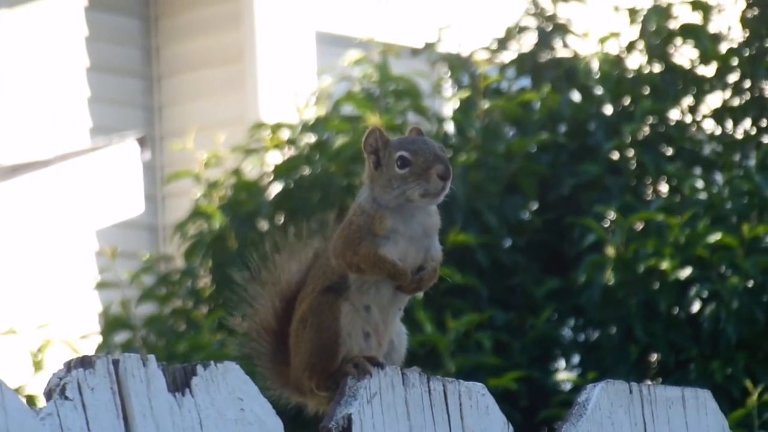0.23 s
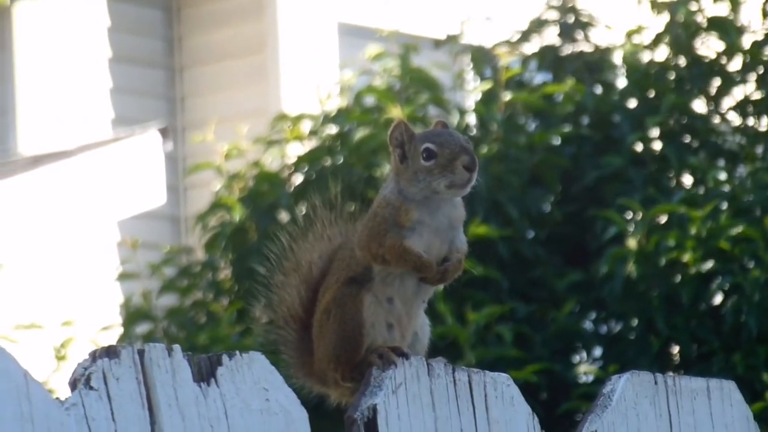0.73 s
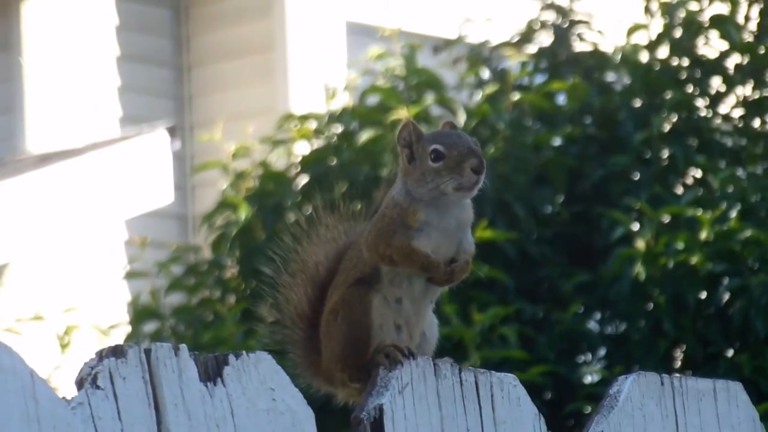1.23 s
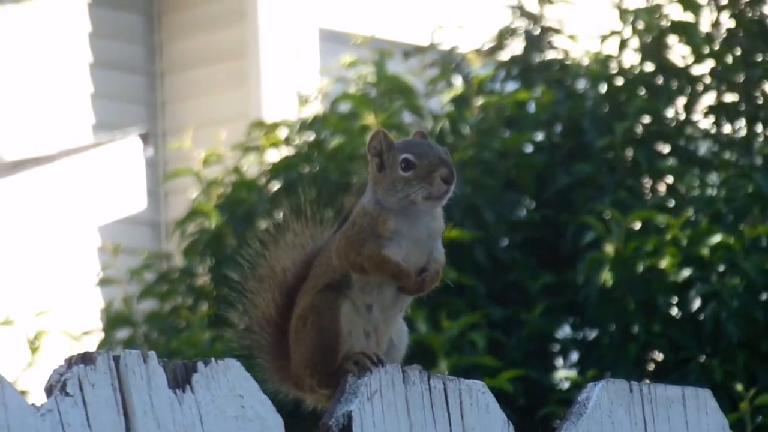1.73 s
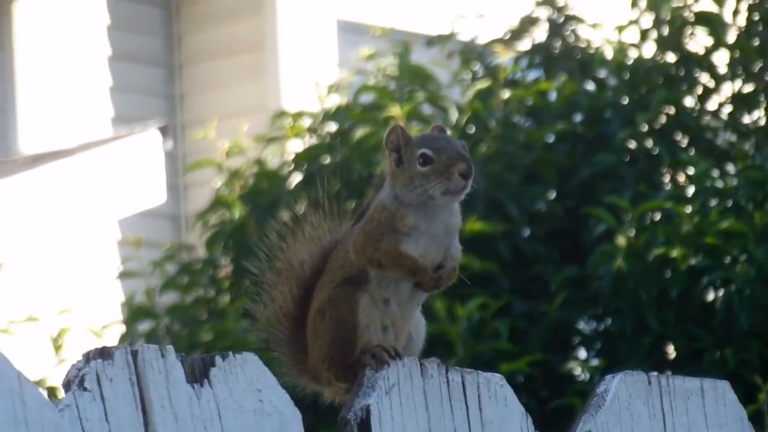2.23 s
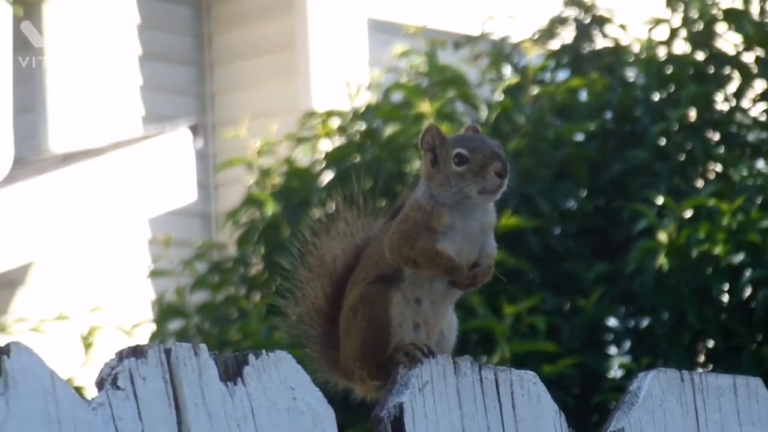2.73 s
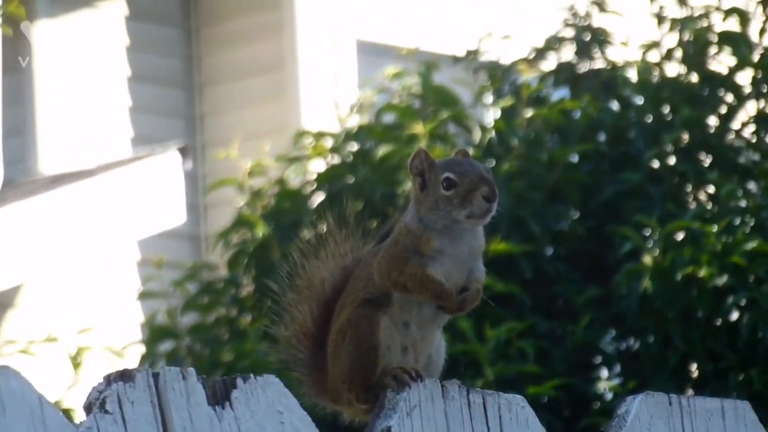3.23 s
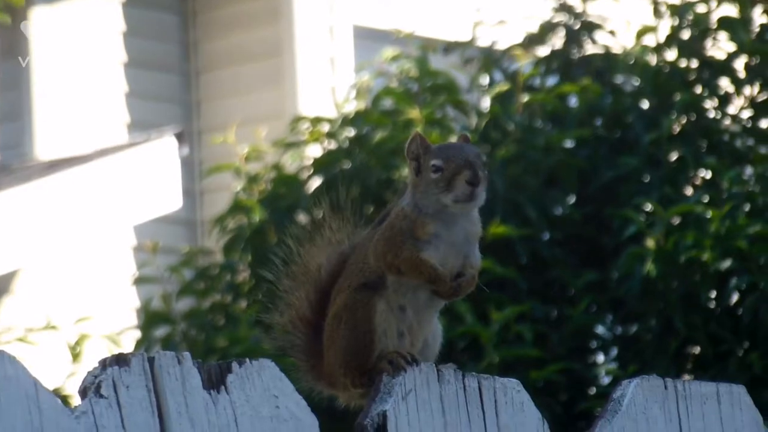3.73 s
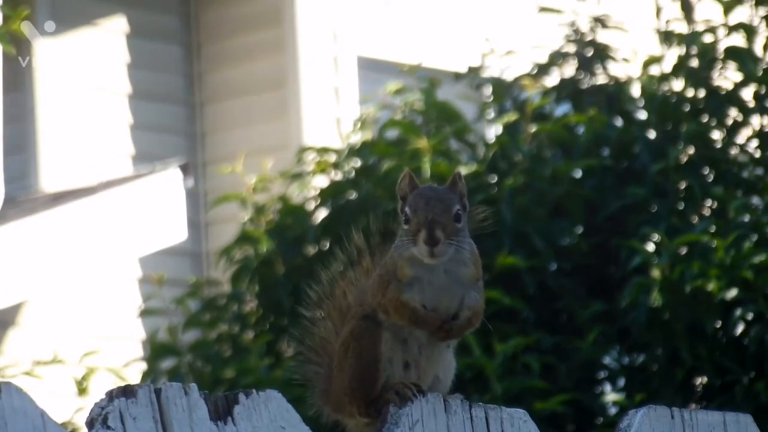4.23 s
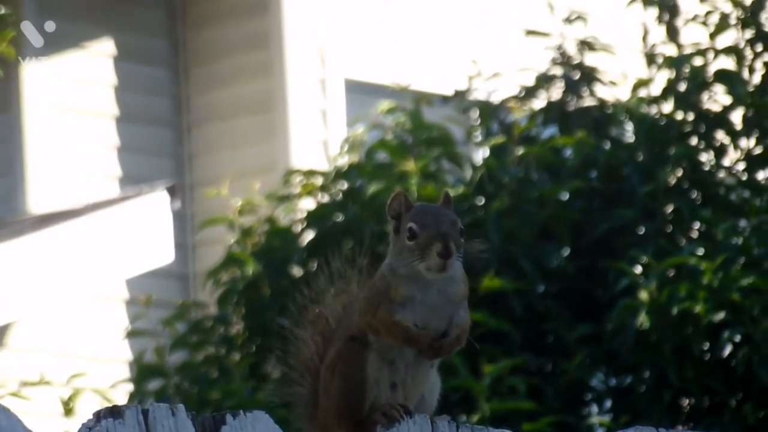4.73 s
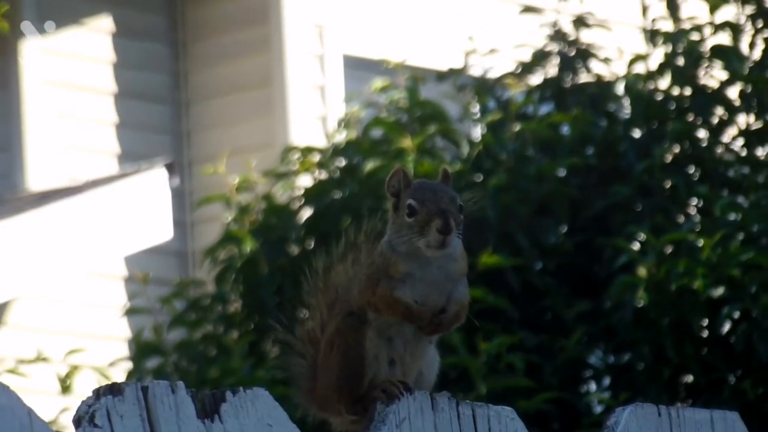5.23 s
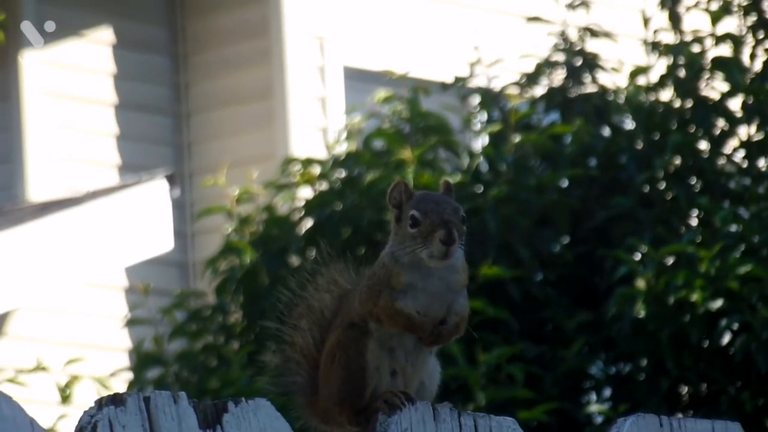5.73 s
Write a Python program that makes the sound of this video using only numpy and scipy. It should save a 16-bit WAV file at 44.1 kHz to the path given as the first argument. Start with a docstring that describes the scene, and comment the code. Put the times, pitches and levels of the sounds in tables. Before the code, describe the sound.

A squirrel gives quick, high, sharp chirps outdoors while a breeze starts rumbling and thumping on the microphone.

```python
"""Quiet suburban hush, and at once a squirrel chirping on a garden fence, metres from a stereo microphone.
Chirps are scooped whistles that turn raspy; the odd hoarse bark is pulses through throat and mouth.
Fence and house walls echo each call. From 0.9 s a breeze buffets the two microphone ports:
its eddies rumble, flutter and thump."""
import sys
import numpy as np
from scipy import signal
from scipy.fft import rfft, irfft
from scipy.io import wavfile
from scipy.ndimage import uniform_filter1d

SR = 44100
rng = np.random.default_rng(int(sys.argv[2]) if len(sys.argv) > 2 else 0)


def output_pcm(signal):
    """Save a mono or channel-first signal as 16-bit PCM at the path in sys.argv[1].

    Samples are clipped to [-1, 1] before scaling.
    """
    pcm = np.clip(np.atleast_2d(signal).T, -1, 1) * 32767
    wavfile.write(sys.argv[1], SR, np.round(pcm).astype(np.int16))


N = 263266

# hush spectrum: (frequency [Hz], relative density [dB])
HUSH_SPECTRUM = [(18, -35), (30, -8.5), (174, -6.5), (300, -2.5), (465, -4), (704, -1), (2000, -12.5),
                 (3780, -19), (5700, -24), (6700, -22), (9000, -28), (11500, -24), (13700, -30.5),
                 (14500, -21)]
# hush stereo width: (frequency [Hz], side over mid [ratio])
HUSH_WIDTH = [(60, 0.37), (600, 0.22), (1400, 0.426), (4000, 0.76), (14000, 0.04)]
# whistles: (time [s], length [s], scoop [s], plateau [Hz], register jump after [s], pitch after jump [Hz],
# level [dB], opening gain [dB], rasp [0-1], half-pitch partial [dB], octave [dB])
WHISTLES = [(0.106, 0.054, 0.00368, 5840, .016, 6700, -30.5, -3, 0.68, -30, -9.5),
            (0.346, 0.047, 0.0069, 5959, 0.023, 5900, -45.5, -1.5, 0.4, -21, -1),
            (0.571, 0.054, 0.003, 5650, 0.023, 6670, -41, -4, 0.6, -18, -2),
            (0.696, 0.05, 0.0055, 5970, .024, 6340, -34.5, -6.5, 0.25, -15.5, -4.5),
            (0.853, 0.054, 0.0072, 5970, 0.019, 6060, -44.5, -2.5, 0.5, -17.5, -2),
            (1.035, 0.097, 0.01, 5590, 0.037, 5835, -41, -6, 0.24, -21.5, -4),
            (1.273, 0.026, 0.0022, 6088, .013, 6040, -33, -9.5, .25, -28, -3),
            (1.398, 0.041, 0.004, 5950, 0.016, 5957, -37.5, -6, 0.16, -14, -7.5),
            (1.501, 0.035, 0.0035, 6050, .013, 5966, -37, -4.5, 0.22, -16.5, -9),
            (1.647, 0.04, 0.0029, 5844, 0.023, 5730, -41, -6, 0.38, -9, 1),
            (1.934, 0.036, 0.0049, 6010, 0.0133, 5705, -40, 1, 0.3, -26, -2),
            (2.104, 0.036, 0.003, 5840, .01, 6510, -37.5, -3, 0.4, -22, -5),
            (2.245, 0.02094, 0.0034, 5640, 0.0088, 5690, -39, 1.5, 0.08, -25, 1),
            (2.392, .04, 0.0031, 6060, 0.014, 6710, -32.5, -11.5, 0.02, -21, -10.5),
            (2.59, 0.0301, 0.00132, 5660, 0.0122, 6710, -36, -2, 0.46, -25, -10),
            (2.729, 0.0472, .0041, 6420, 0.0082, 6660, -34.5, -10, 0.68, -29.5, -14),
            (3.218, 0.041, 0.004, 6240, 0.018, 6200, -38, -4, 0.08, -18, -3),
            (3.416, 0.052, 0.0029, 5970, 0.0175, 6676, -35, -9, 0.2, -20, -4),
            (3.612, 0.029, .0036, 5950, .011, 5950, -41, -8, 0.33, -18, -0.5),
            (3.778, .039, 0.00286, 5930, 0.014, 6580, -33, -2, 0.3, -20.5, -3.5),
            (4.158, 0.0395, 0.0026, 5840, 0.016, 6530, -35, -8.5, 0.25, -19.5, -3),
            (4.326, 0.028, 0.0028, 5780, 0.014, 6510, -29, -9.5, 0.3, -21.5, -5.5),
            (4.578, 0.018, 0.00197, 5940, 0.0051, 5830, -34, -11, 0, -52, -8),
            (4.739, 0.027, 0.0029, 5770, 0.017, 5850, -37, 1, 0.1, -18.5, -1.5),
            (5.073, 0.036, 0.003, 5900, 0.018, 6120, -41.5, -3.5, 0.22, -18, 0),
            (5.281, 0.028, 0.00316, 6320, 0.00596, 6550, -37, -16, 0.68, -23, -3.5),
            (5.528, 0.059, 0.0017, 6350, 0.00994, 6610, -36.5, -17.5, 0.8, -24, -10.5),
            (5.765, 0.054, .0035, 5710, 0.02, 6630, -40, -4.5, 1, -22, -6),
            (5.961, 0.0306, 0.0027, 5800, 0.016, 5750, -38, -1, .25, -21, -4)]
# air noise in the mouth: (centre [Hz], width [Hz])
BREATH_BANDS = [(8300, 7200), (10200, 1400), (12600, 3400)]
# fence and wall echoes: (delay [s], left [dB], right [dB])
WALL_ECHOES = [(.010, -3.5, 4), (0.018, -3, -23), (0.032, -11.5, -8), (.08, -31, -29.5)]
# diffuse tail: (low edge [Hz], high edge [Hz], t60 [s], level before band-pass [dB])
YARD_TAILS = [(1000, 3700, 0.33, -2), (4900, 9300, 0.29, -3.5), (10400, 10700, 0.14, -19.5)]
# phase between the ports: (frequency [Hz], left lead [rad])
PORT_LEAD = [(1000, 0), (3000, -.4), (5000, -1.3), (6050, -1.5), (6500, -1.2), (9000, -1.2), (14000, -.9)]
# barks: (time [s], level [dB], treble [dB], length [s], puff [0-1])
HOARSE_BARKS = [(0.748, -47.5, -10.5, 0.027, 1), (1.1027, -33.5, -1, 0.03816, 0.5),
                (2.784, -39.5, 2, 0.018, 0.03), (2.911, -54, -9, 0.025, 0.69),
                (3.046, -46, -9.5, 0.018, 0.59), (3.8354, -38.5, 5, 0.017, 0), (3.9737, -40, 1, 0.02, 0.61),
                (4.371, -39.5, 4.5, .02, 0.58)]
# bark resonances, both tables: (centre [Hz], width per filter pass [Hz], gain [dB])
THROAT_MODES = [(1339, 230, 2.5), (2810, 1050, 7.5), (3520, 287, 12.5), (5910, 1700, 5), (7550, 280, 8.5)]
MOUTH_MODES = [(8400, 560, -1.5), (11160, 2700, 3.5), (12890, 1630, -4)]
# breeze on the ports: (time [s], rumble [dB], left minus right [dB])
BREEZE = [(0.9, -72, 5), (0.96, -50, 10), (1.2, -46.5, 5), (1.31, -64, -4), (1.376, -39.5, 13),
          (1.44, -56.5, 1), (1.552, -36, 8.5), (1.7, -46.5, 3), (1.86, -48, 2), (2.0, -41, 6),
          (2.18, -48, 11), (2.27, -56.5, 3), (2.44, -50, -2), (2.53, -59, 0), (2.58, -40.5, 14),
          (2.7, -49, 2), (2.93, -48, 5.5), (3.05, -54, 2), (3.27, -44.5, 8), (3.53, -47, 3),
          (3.6, -55.5, 7), (3.766, -54.5, 0), (3.81, -39.5, -8), (3.87, -44, 12), (4.01, -44.5, -12),
          (4.05, -43.5, 2), (4.18, -39.5, -11), (4.21, -45.5, 12.5), (4.35, -37.5, 3.5), (4.5, -53.5, 8),
          (4.64, -48.5, -16), (4.705, -38, 6), (4.76, -53, 9), (4.919, -44.5, -3), (5.03, -51, 6),
          (5.2, -38, -2), (5.374, -50.5, 2.5), (5.55, -41, 2), (5.83, -39, -2), (5.97, -50.5, 18)]
# strong eddies: (time [s], peak [dB], pitch [Hz], snap [dB], port [-1 left, 1 right])
STRONG_EDDIES = [(1.22, -21, 342, -40, -1), (1.38, -22, 382, -17, 1), (1.379, -15, 241, -30, -1),
                 (1.528, -19, 256, -35, -1), (1.545, -16, 376, -26, 1), (1.547, -16.5, 258, -36, -1),
                 (1.561, -14.5, 234, -35, -1), (1.574, -13.5, 243, -25.5, 1), (1.739, -23.5, 254, -20, -1),
                 (1.785, -21, 240, -28, -1), (1.911, -19.5, 220, -34, -1), (1.996, -14.5, 255.6, -23, 1),
                 (2.011, -8, 245, -9, -1), (2.099, -12.5, 397, -15, -1), (2.178, -22, 237, -43.5, -1),
                 (2.196, -21, 232, -34, -1), (2.59, -18.5, 255.5, -40, -1), (2.665, -25, 261, -36.5, -1),
                 (2.802, -25.5, 356, -17, -1), (2.932, -24.5, 167, -17, -1), (3.098, -25, 216, -27, -1),
                 (3.189, -19, 266, -39, -1), (3.243, -17.5, 292, -32, -1), (3.259, -20, 270, -17, -1),
                 (3.35, -18.5, 347, -3.5, -1), (3.426, -23.5, 232, -22, -1), (3.524, -12.5, 402, -17, -1),
                 (3.537, -11, 372, -8.5, -1), (3.666, -25, 320, -31, 1), (3.811, -15.5, 267, -37, 1),
                 (3.824, -9.5, 437, -40.5, -1), (3.919, -20, 410, -29, -1), (3.936, -14, 266, -22, -1),
                 (3.96, -16, 317, -16, 1), (4.01, -18, 225, -36, 1), (4.052, -12, 319.6, -24.5, -1),
                 (4.122, -20, 290, -19, -1), (4.154, -15, 282, -28, -1), (4.159, -4, 415, -11.5, 1),
                 (4.174, -13.5, 331, -32, 1), (4.179, -20, 452, -3, -1), (4.335, -10, 245, -40, -1),
                 (4.342, -17.5, 466, -23, 1), (4.39, -13, 260, -31, -1), (4.695, -17.5, 243, -38, 1),
                 (4.906, -19, 209, -35.5, -1), (5.148, -7.5, 416, -12.5, -1), (5.161, -17, 305, -4, -1),
                 (5.167, -18, 524, -15.5, 1), (5.172, -14, 416, -25, -1), (5.226, -22.5, 420, -7, -1),
                 (5.233, -23.5, 450, -15, -1), (5.432, -19, 307, -37, 1), (5.491, -14.5, 256, -23, 1),
                 (5.51, -14.5, 287.7, -29.5, -1), (5.585, -13.5, 307, -24, -1),
                 (5.598, -10.5, 420, -28.5, -1), (5.608, -13, 330, -13, -1), (5.705, -12.5, 413, -22, -1),
                 (5.789, -18.5, 255, -37, 1), (5.815, -19, 417, -23, -1), (5.837, -16, 264, -33, 1),
                 (5.858, -4.5, 417, -29, -1)]


def undb(db):
    return 10 ** (np.asarray(db) / 20)


def level(x, rms_db):
    return x * undb(rms_db) / np.sqrt(np.mean(x ** 2))


def ring(x, hz, width_hz):
    return signal.lfilter(*signal.iirpeak(hz, hz / width_hz, SR), x)


def band(x, lo_hz, hi_hz):
    return signal.sosfilt(signal.butter(2, [lo_hz, hi_hz], "band", fs=SR, output="sos"), x)


def walk(count, rate_hz):
    """Smooth random wander, spread near 1."""
    hold = max(int(SR / rate_hz), 2)
    steps = np.repeat(rng.standard_normal(count // hold + 1), hold)
    return 1.78 * uniform_filter1d(uniform_filter1d(steps, hold), hold)[:count]


def ramp(t, start_s, width_s):
    return np.clip((t - start_s) / width_s, 0, 1)


def add(out, time_s, x, pan_db):
    i = int(time_s * SR)
    x = x[:N - i]
    out[:, i:i + len(x)] += x * undb([[pan_db / 2], [-pan_db / 2]])


def suburb(hush_db=-55, whine_hz=13250, whine_db=-78):
    """Distant hush, alike left and right in the bass, plus a faint wavering whine."""
    log_hz = np.log(np.fft.rfftfreq(N, 1 / SR) + 1)
    colour_db, width = (np.interp(log_hz, np.log(hz), values)
                        for hz, values in (np.transpose(HUSH_SPECTRUM), np.transpose(HUSH_WIDTH)))
    mid, side = rfft(rng.standard_normal((2, N)), axis=1) * undb(colour_db)
    side *= width
    hush = irfft(np.array([mid + side, mid - side]), N, axis=1)
    hush *= undb(hush_db + 0.09 * walk(N, 2.2)) / np.std(hush.mean(0))
    whine = ring(rng.standard_normal(N), whine_hz, 110) * undb(2 * walk(N, 6.5))
    return hush + level(whine, whine_db)


def chirp(length_s, scoop_s, plateau_hz, jump_s, jump_hz, db, opening_db, rasp, half_db, octave_db):
    """Whistle: scoops up, may jump register, falls. Late on, every second cycle weakens into a rasp."""
    end_hz, mouth_hz, mouth_half_width_hz = 5150, 11800, 900
    n = int(length_s * SR)
    t = np.arange(n) / SR
    late = ramp(t, 0.63 * jump_s, 0.0062)
    fall = ramp(t, 0.62 * length_s, 0.38 * length_s) ** 1.5
    hz = plateau_hz * (1 - 0.23 * np.exp(-t / scoop_s))
    hz += (jump_hz - plateau_hz) * ramp(t, jump_s, 0.00107)
    hz += (end_hz - hz) * fall
    hz *= 1 + (0.004 + 0.025 * rasp * late + 0.025 * fall) * walk(n, 1200)
    phase = 2 * np.pi * np.cumsum(hz) / SR
    mouth = 1 / (1 + ((2 * hz - mouth_hz) / mouth_half_width_hz) ** 2)  # resonance favours the octave
    tone = np.sin(phase) + undb(octave_db) * mouth * ramp(t, scoop_s, 2 * scoop_s) * np.sin(2 * phase)
    uneven = late * (1 - 0.6 * fall) * undb(5 * walk(n, 400))
    fifth_db = half_db - 7.5 + 19 * rasp
    tone += uneven * (undb(half_db) * np.sin(phase / 2) + undb(fifth_db) * np.sin(1.5 * phase))
    breath = sum(ring(rng.standard_normal(n), *resonance) for resonance in BREATH_BANDS)
    breath *= 0.35 * rasp ** 2 * ramp(t, 0.67 * jump_s, 0.5 * length_s) * undb(4 * walk(n, 260))
    opening = 1 - ramp(t, 0.64 * jump_s, 0.5 * jump_s)
    effort_db = -18 * np.exp(-t / (1.33 * scoop_s)) + opening_db * opening - 9 * fall + 2 * walk(n, 330)
    gate = ramp(t, 0, 0.00045) * ramp(-t, -length_s, 0.0017)
    return undb(db + effort_db) * gate * (tone + breath)


def yard(smear_s=0.0055):
    """Stereo impulse response: direct sound, echoes scattered by boards and leaves, diffuse tail."""
    t = np.arange(int(0.5 * SR)) / SR
    mid, side = rng.standard_normal((2, len(t)))
    scatter = np.array([mid + 0.27 * side, mid - 0.22 * side])
    out = np.zeros((2, len(t)))
    out[:, 0] = 1
    for delay_s, left_db, right_db in WALL_ECHOES:
        echo = scatter * np.exp(-((t - delay_s) / smear_s) ** 2)
        out += echo * undb([[left_db], [right_db]]) / np.linalg.norm(echo[0])
    for lo_hz, hi_hz, t60_s, db in YARD_TAILS:
        tail = scatter[:, ::-1] * ramp(t, 0.0015, 0.0063) * undb(-60 * t / t60_s)
        out += undb(db) * band(tail / np.linalg.norm(tail[0]), lo_hz, hi_hz)
    return out


def ports(left, right, tilt_db_at_12khz=-3.5):
    """The left port lags and is duller in the treble."""
    hz = np.fft.rfftfreq(N, 1 / SR)
    lead_rad = np.interp(hz, *np.transpose(PORT_LEAD))
    response = np.exp(1j * lead_rad) * undb(tilt_db_at_12khz * (hz / 12000) ** 2)
    return np.array([irfft(rfft(left) * response, N), right])


def bark(db, treble_db, length_s, puff, pulse_hz=1420):
    """Ragged pulses and breath ring throat and mouth; some air escapes as a plain puff."""
    n = int((length_s + 0.0044) * SR)
    t = np.arange(n) / SR
    cycles = np.cumsum(pulse_hz * (1 + 0.05 * walk(n, 900))) / SR
    source = np.diff(np.floor(cycles), prepend=0) + 0.12 * rng.standard_normal(n)
    source *= undb(4 * walk(n, 500))
    source *= ramp(t, 0, 0.39 * length_s) * ramp(-t, -length_s, 0.062 * length_s)
    throat, mouth = (sum(undb(gain_db) * ring(ring(source, hz, width_hz), hz, width_hz)
                         for hz, width_hz, gain_db in modes) for modes in (THROAT_MODES, MOUTH_MODES))
    air = band(source, 1210, 6230)
    throat, mouth, air = (x / np.std(x) for x in (throat, mouth, air))
    return undb(db) * ((1 - puff) * throat + puff * air + undb(treble_db) * mouth)


def squirrel(pan_db=4):
    """Calls from left of centre, through the yard to the ports."""
    calls = np.zeros((2, N))
    for time_s, *shape in WHISTLES:
        add(calls, time_s, chirp(*shape), pan_db)
    for time_s, *shape in HOARSE_BARKS:
        add(calls, time_s - 0.006, bark(*shape), pan_db)
    return ports(*signal.fftconvolve(calls, yard(), axes=1)[:, :N])


def buffeting(rumble_db, pan_db):
    """Breeze on the ports: rumble and lumpy flutter, nearly unrelated left and right."""
    flutter_db = np.minimum(-3 + 0.81 * (rumble_db + 44), 0.5)  # gains on the rumble as the breeze rises
    shared = band(rng.standard_normal(N), 21, 81)  # the largest eddies cover both ports
    out = np.zeros((2, N))
    for port in range(2):
        rumble = band(rng.standard_normal(N), 68, 143.5) + 0.68 * shared
        rumble *= undb(5.1 * walk(N, 25.045))
        noise = rng.standard_normal(N)
        lumps_db = np.minimum(7.2 * walk(N, 60) + 4.3 * walk(N, 200), 16)
        flutter = band(noise * undb(lumps_db), 82.9, 286)
        out[port] = level(rumble, 0.7) + undb(flutter_db) * level(flutter, 3.3)
    onset = ramp(np.arange(N) / SR, 0.903, 0.058)
    return out * undb(rumble_db + np.array([pan_db, -pan_db]) / 2) * onset


def small_eddies(rumble_db, pan_db, rate_hz=41, pitch_hz=222.2, cap_db=-21, snap_db=-56):
    """Random rows like STRONG_EDDIES: they grow with the breeze and favour the windward port."""
    when, rarity, pitch, side = rng.random((400, 4))[:int(rate_hz * N / SR)].T
    i = (when * (N - 1)).astype(int)
    peak_db = np.minimum(rumble_db[i] + 10.5 - 3.17 * np.log(rarity + 1e-3), cap_db)
    port = np.where(side < 1 / (1 + undb(-pan_db[i])), -1, 1)
    rows = np.transpose([i / SR, peak_db, pitch_hz * 2 ** (pitch - 0.4), np.full(len(i), snap_db), port])
    return [tuple(row) for row in rows if row[0] > BREEZE[0][0]]


def thump(hz, snap_db, phase_rad, decay_cycles, rise_s, snap_hz=950):
    """One eddy on a port: a couple of cycles sliding down in pitch, short snap on top."""
    t = np.arange(int(0.035 * SR)) / SR - rise_s
    cycles = t * hz
    envelope = np.exp(-(cycles / np.where(cycles < 0, 0.5, decay_cycles)) ** 2)
    body = np.sin(2 * np.pi * (cycles - 0.39 * cycles * np.clip(cycles, -1, 4)) + phase_rad)
    snap = np.sin(2 * np.pi * snap_hz * t + phase_rad) * np.exp(-(t / 0.000827) ** 2)
    return body * envelope + undb(snap_db) * snap


def wind(rise_s=0.008):
    """Gusty buffeting plus single eddies, each thumping one port."""
    gust_s, *columns = np.transpose(BREEZE)
    rumble_db, pan_db = (np.interp(np.arange(N) / SR, gust_s, column) for column in columns)
    out = buffeting(rumble_db, pan_db)
    for time_s, db, hz, snap_db, port in STRONG_EDDIES + small_eddies(rumble_db, pan_db):
        turn, tail = rng.random(2)
        pop = undb(db) * thump(hz, snap_db, 2 * np.pi * turn, 0.57 + 0.36 * tail, rise_s)
        i = int((time_s - rise_s) * SR)
        out[int(port > 0), i:i + len(pop)] += pop[:N - i]
    return out


def scene():
    return squirrel() + wind() + suburb()


def record(dry, rolloff_hz=13600, cutoff_hz=14200):
    """The microphone fades in the top octave; the recorder cuts it off."""
    dulled = signal.sosfilt(signal.butter(4, rolloff_hz, fs=SR, output="sos"), dry)
    return signal.sosfilt(signal.ellip(10, 0.2, 80, cutoff_hz, fs=SR, output="sos"), dulled)


dry = scene()
out = record(dry)
output_pcm(out)
```